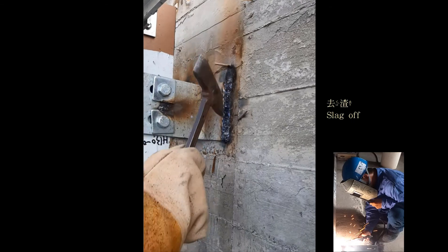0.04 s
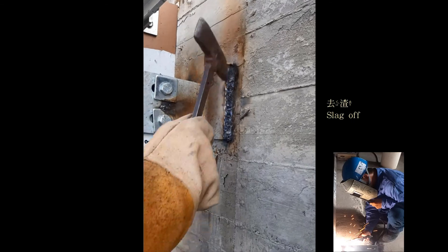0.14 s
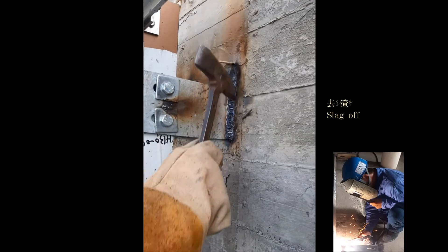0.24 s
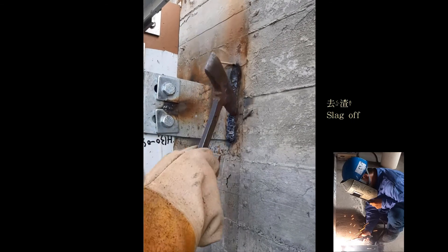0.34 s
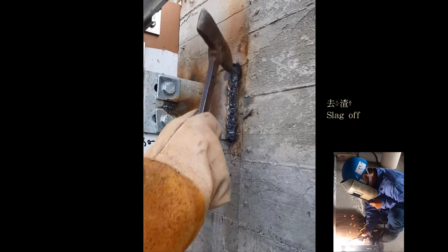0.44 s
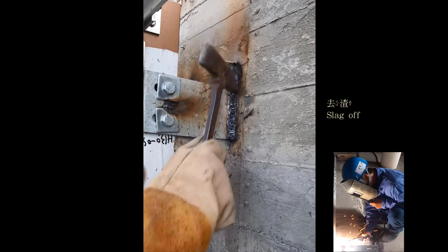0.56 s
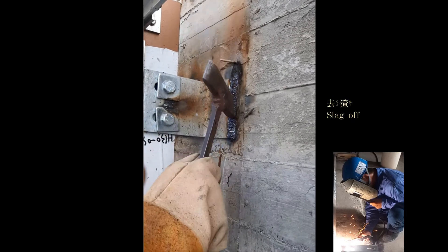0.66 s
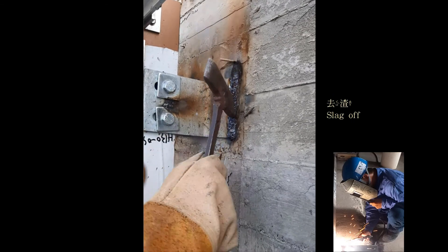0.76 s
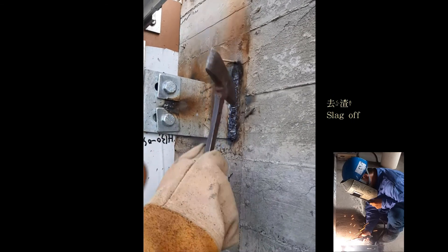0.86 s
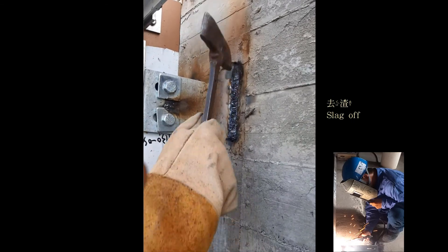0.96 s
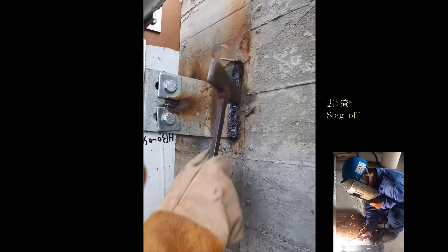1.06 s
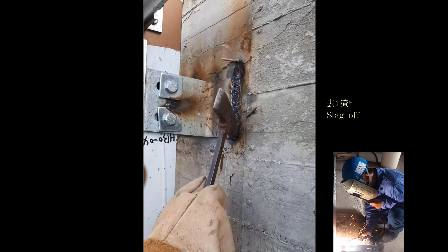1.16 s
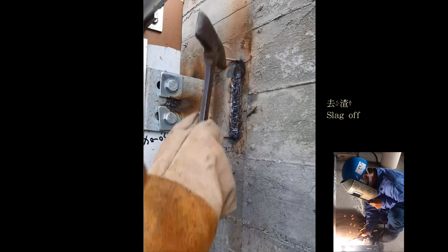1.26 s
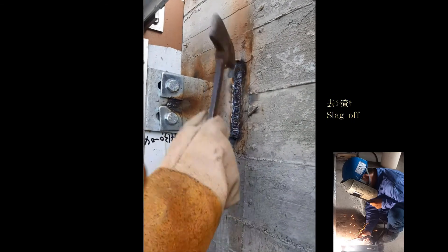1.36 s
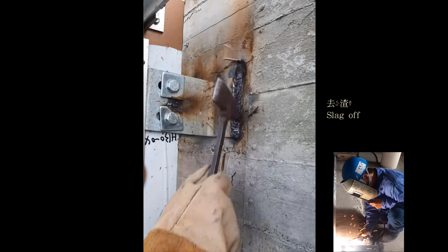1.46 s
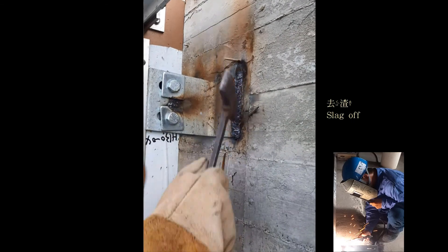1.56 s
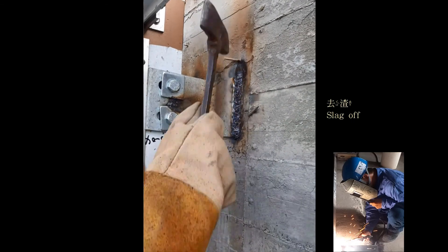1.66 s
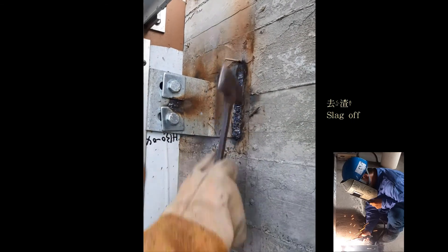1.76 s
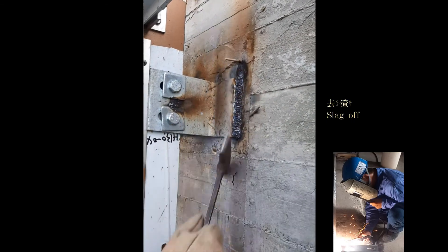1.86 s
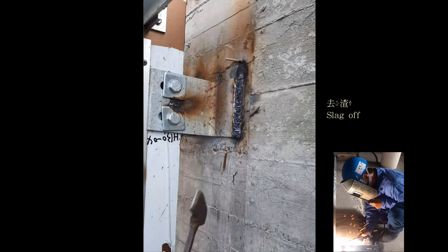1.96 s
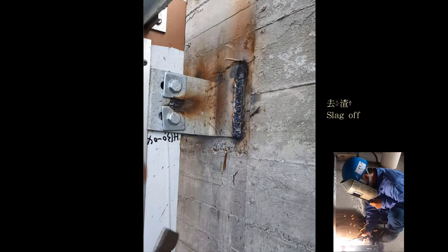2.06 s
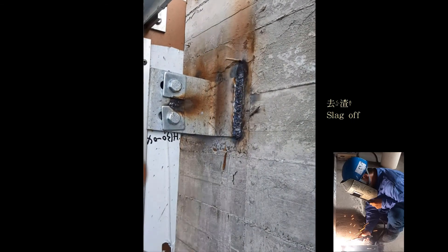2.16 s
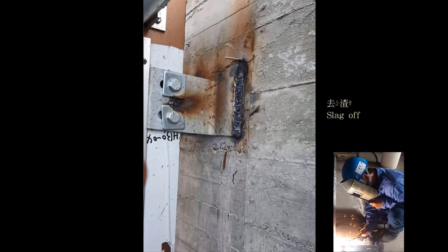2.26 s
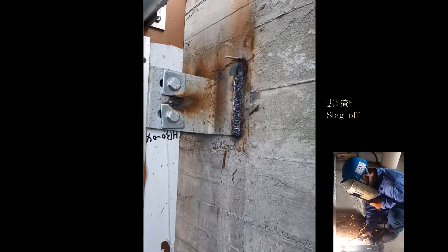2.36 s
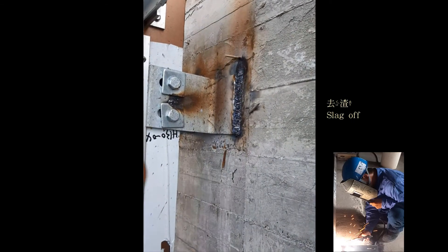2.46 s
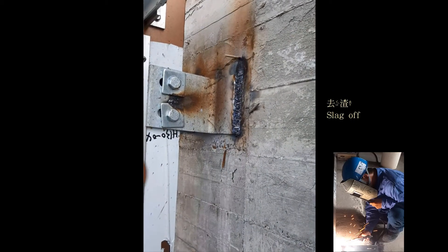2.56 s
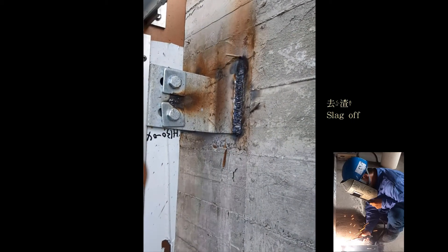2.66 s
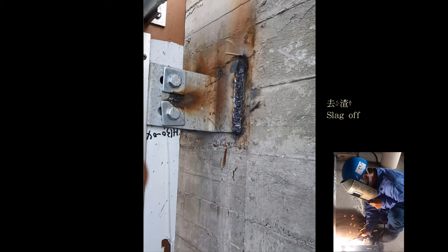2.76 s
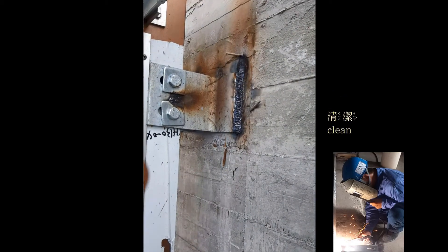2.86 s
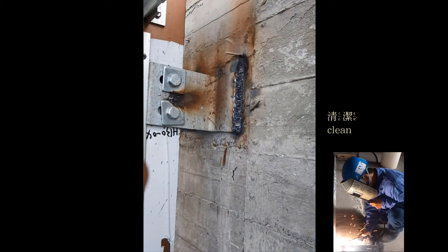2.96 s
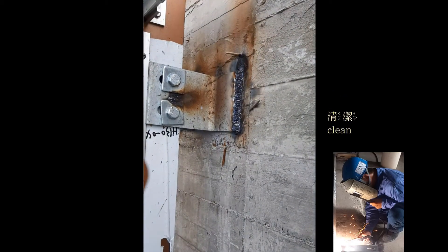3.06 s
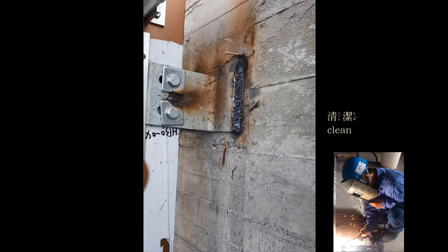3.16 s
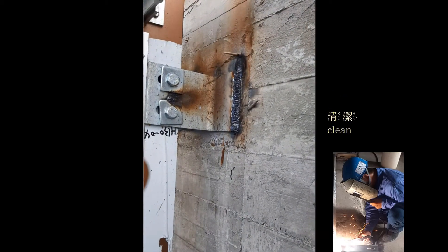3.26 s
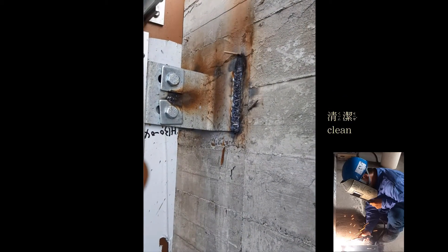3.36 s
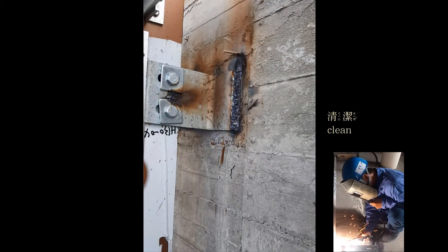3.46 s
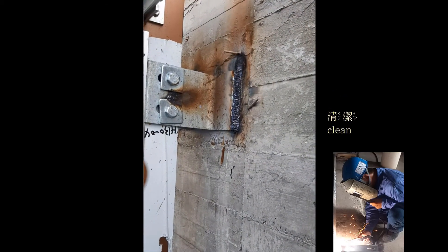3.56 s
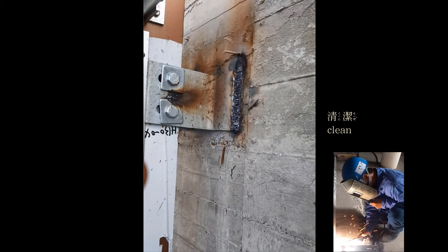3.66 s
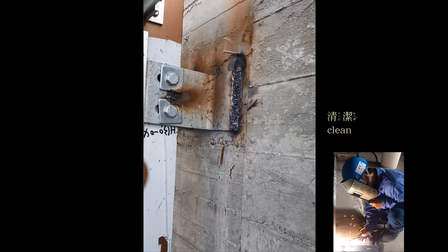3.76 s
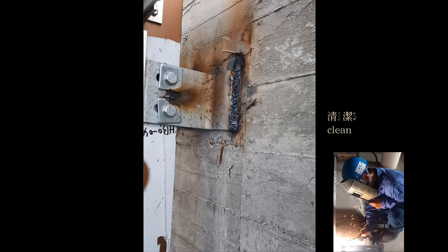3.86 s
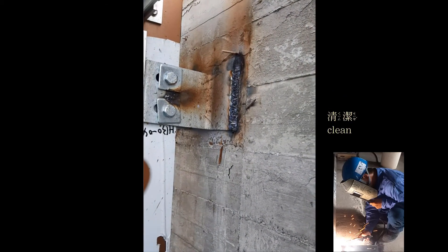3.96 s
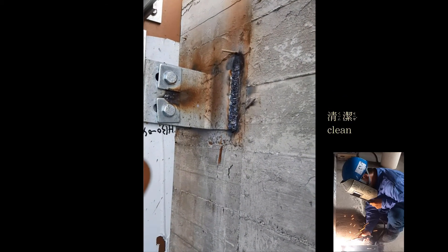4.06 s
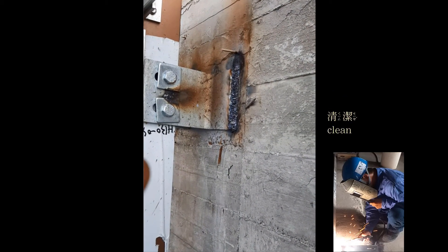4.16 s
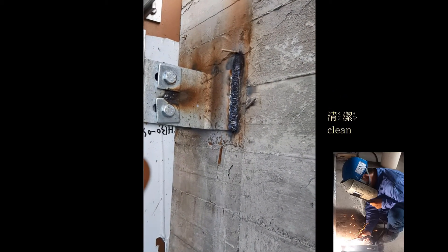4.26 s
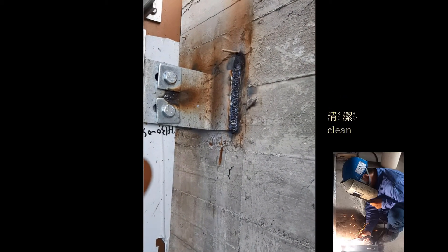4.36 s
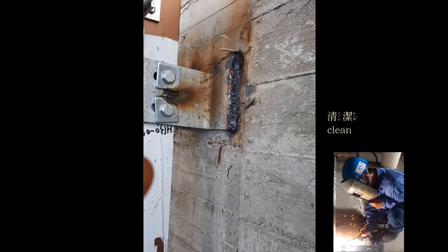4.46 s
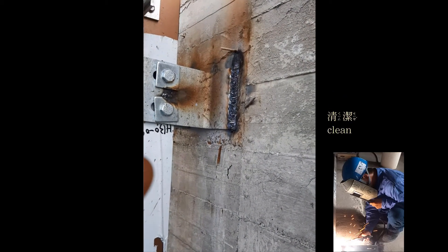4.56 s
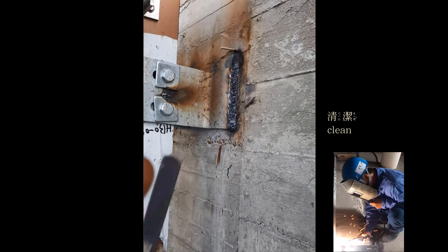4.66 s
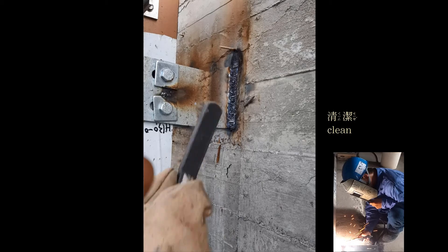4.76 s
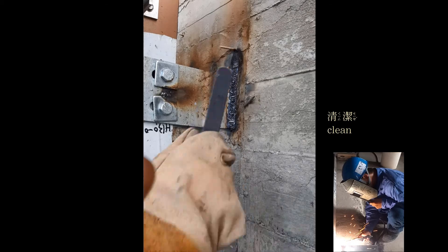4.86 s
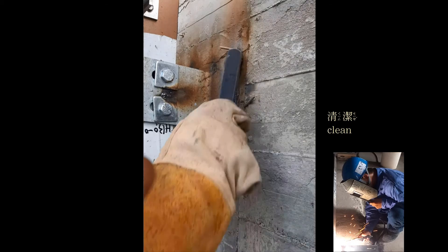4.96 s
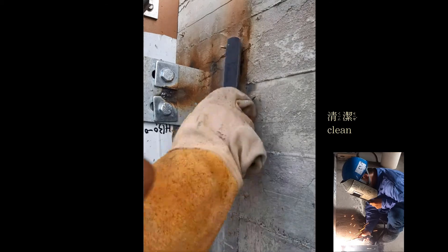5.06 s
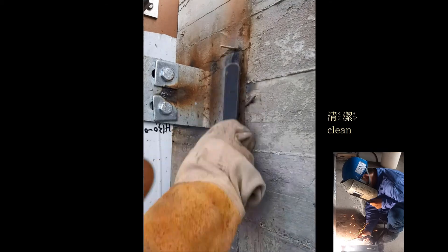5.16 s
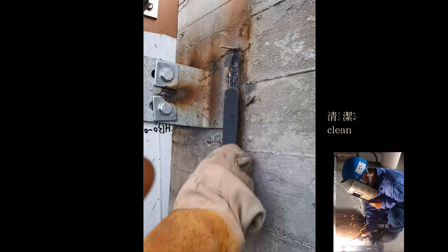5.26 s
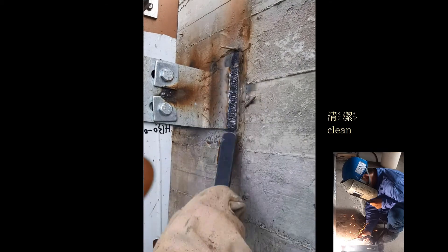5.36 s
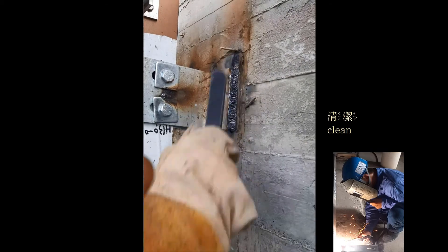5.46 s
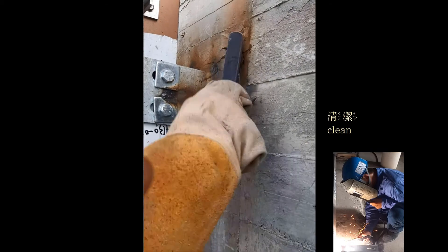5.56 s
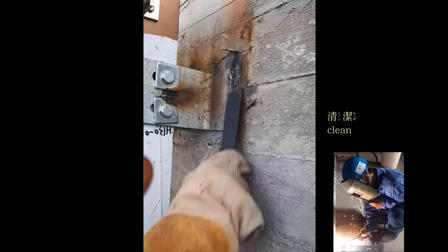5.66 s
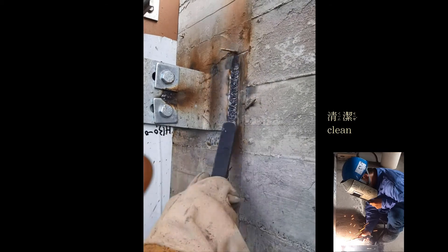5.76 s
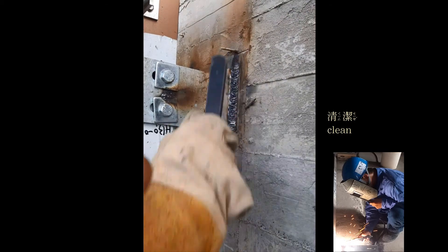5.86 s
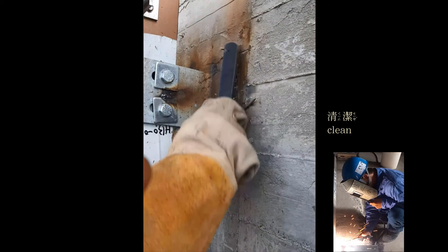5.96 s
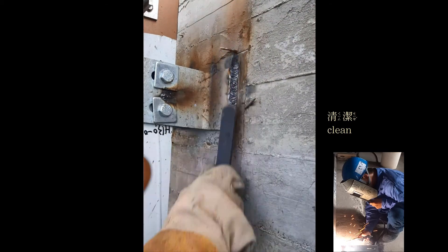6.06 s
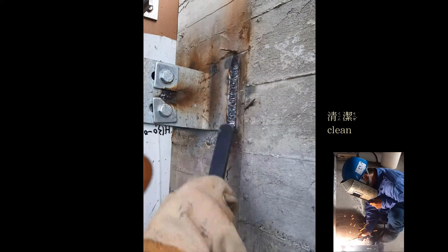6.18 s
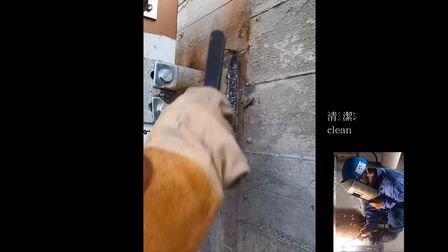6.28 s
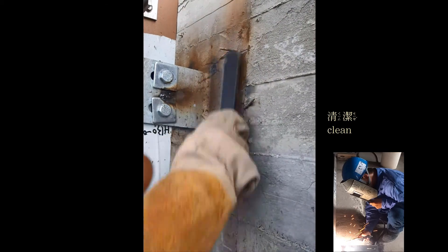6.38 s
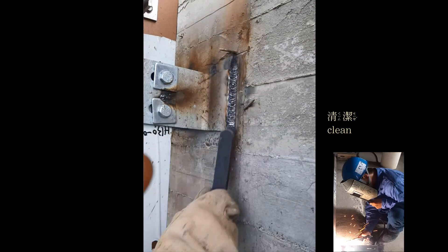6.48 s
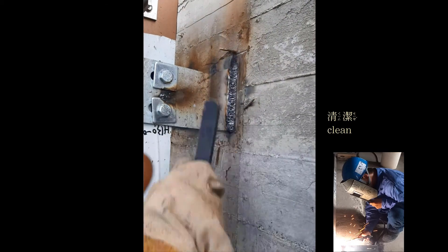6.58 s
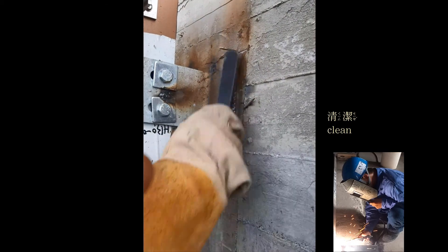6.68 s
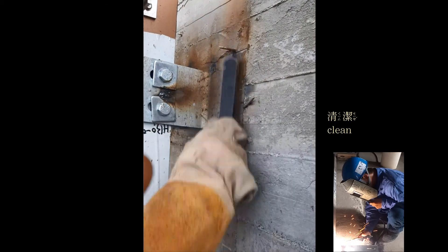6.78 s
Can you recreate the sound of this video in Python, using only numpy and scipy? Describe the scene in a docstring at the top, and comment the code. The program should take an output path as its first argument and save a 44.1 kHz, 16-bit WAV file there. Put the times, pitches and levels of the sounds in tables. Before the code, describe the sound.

Close up at an outdoor worksite, a chipping hammer strikes a weld in uneven sharp, high ringing clinks with quick rebounds and crunchy scrapes, ending in a rapid clatter. A pause follows with faint ticks and grit over distant machinery that grows louder. Then a wire brush knocks the steel and scrubs in five harsh, hissing strokes that speed up.

```python
"""At a worksite, a chipping hammer knocks slag off a weld on a steel bracket, then a wire brush scrubs it.
Distant machinery is filtered noise with brief low tones; the background grows louder after three seconds. Each
hammer blow is a burst of noise that sets steel modes ringing, with rebounds and drags along the bead. Flakes
tick down as short noise bursts with a ring, and grit rustles as random tiny contacts. The brush hisses and
rasps with its speed, and knocks, jingles and squeaks here and there."""
import sys
import numpy as np
from scipy import signal
from scipy.fft import rfft, irfft, next_fast_len
from scipy.io import wavfile
from scipy.ndimage import uniform_filter1d

SR = 44100
rng = np.random.default_rng(int(sys.argv[2]) if len(sys.argv) > 2 else 0)


def generate_wav(sig):
    """Save sig (samples, or channels by samples) to the path in sys.argv[1] as 16-bit PCM at SR."""
    pcm = np.round(np.clip(np.atleast_2d(sig).T, -1, 1) * 32767).astype(np.int16)
    wavfile.write(sys.argv[1], SR, pcm)


N = 300762
TIME = np.arange(N) / SR  # seconds

# Event levels are starting values that the functions trim; colours give relative level_db across pitch.

# worksite loudness over time: start_s, rumble_db, air_db
SITE_LEVELS = [(0.0, -49.5, -58.5), (1.85, -50.5, -57.5), (2.1, -53, -59), (2.96, -53.5, -58),
               (3.08, -45.5, -49.5), (3.5, -41.5, -46), (4.95, -39, -44.5), (6.82, -40.5, -45.5)]
# colour of the machinery rumble: pitch_hz, level_db
RUMBLE_COLOUR = [(15, -47.5), (25, -23), (38, -26.5), (59, -9.5), (92, -5), (130, 0), (172, 1), (285, -3),
                 (321, -5.5), (408, -4.5), (512, -9), (600, -20), (780, -54), (1320, -120)]
# colour of the far wash of air: pitch_hz, level_db
AIR_COLOUR = [(350, -25.5), (600, 1.5), (1000, -0.5), (1550, -2), (2100, -9.5), (4000, -15), (5500, -21.5),
              (7200, -24.5), (8300, -37), (11500, -32.5), (13000, -41.5), (16000, -65.5)]
# low tones that swell briefly in the rumble: centre_s, pitch_hz, half_length_s, level_db
RUMBLE_SWELLS = [(0.047, 114, 0.063, -49.5), (2.57, 205.5, 0.043, -43.5), (6.678, 80.2, 0.28, -42.5)]
# how alike left and right are, far and near: pitch_hz, likeness (0 to 1)
FAR_LIKENESS = [(30, .84), (70, .94), (140, .96), (300, .88), (600, .72), (1200, .5), (2500, .3),
                (6000, .2)]
NEAR_SIDES_LIKENESS = [(200, 1), (1000, 0.7), (3000, 0.78), (7000, 0.18), (14000, 0.62)]
# sound bends round the microphones: pitch_hz, left_lead_radians
LEFT_LEAD = [(300, 0.36), (1030, 0.49), (2150, 1.37), (3200, 1.87), (4000, 2.14), (4700, 0.94),
             (5250, 5.23), (6600, 3.62), (8000, 8.8), (11000, 8.02), (16000, 8.5)]

# flakes of slag landing: start_s, peak_db, treble_db, pitch_hz, ring_db
FLAKES = [(2.804, -39, -58, 1860, -36.5), (3.545, -40, -65, 3270, -43), (3.5947, -41.5, -60, 4500, -41),
          (3.6282, -46, -58, 4100, -46), (3.7319, -56, -62, 5530, -50), (3.969, -42.5, -57, 3680, -48),
          (4.0306, -36, -53, 4550, -46), (4.261, -60, -70, 2900, -47)]
# colours of a flake's body and treble: pitch_hz, level_db
FLAKE_COLOUR = [(700, -7), (1400, 1), (1850, -0.5), (2400, -16), (3000, -2), (4200, -3), (6500, 0),
                (8000, -17.5), (10000, -48.5)]
FLAKE_TREBLE_COLOUR = [(5000, -27), (8000, 4.5), (13000, 0), (16000, -21)]
# ring of a landing flake: pitch_multiple, level_db, t60_s (time to fade by 60 dB)
FLAKE_MODES = [(1, -0.5, 0.033), (1.24, -4.5, 0.028)]
# faint gritty rustles: centre_s, half_length_s, level_db
GRIT_RUSTLES = [(3.51, 0.033, -56), (3.666, 0.1, -59), (3.853, 0.048, -49.5), (4.045, 0.12, -53),
                (4.208, 0.016, -53.5), (4.365, 0.068, -59.5), (4.797, 0.061, -55.5)]
# colour of grit: pitch_hz, level_db
GRIT_COLOUR = [(1500, -11), (2400, 1), (4000, -1), (7200, 1), (8500, -8), (12500, -3), (16000, -36)]
# resonances of the rubbed bracket, damped by the brush: pitch_hz, level_db, t60_s
RUBBED_BRACKET_MODES = [(1270, -3, .04), (1380, -2, .04), (1570, -2, .04), (2360, -4, .05), (2600, -2, .05),
                        (3180, -2, .05), (4330, -1, .04), (4880, 0, .04), (5020, 0, .04), (5400, -1, .03),
                        (6000, -2, .03), (6950, -2, .04)]

# brush strokes along the weld: fastest_s, length_s, hiss_db, rasp_db
BRUSH_STROKES = [(5.295, 0.49, -1, -2.5), (5.735, 0.32, -1.5, -2), (6.111, .31, 1, 0),
                 (6.488, 0.27, 1.5, 0.5), (6.875, 0.26, 1.5, 3)]
# a few wires snag and spring free: start_s, hold_s, hiss_db, rasp_db
WIRE_SNAGS = [(4.998, 0.028, -69, -41), (5.036, 0.064, -49.5, -45.5), (5.13, 0.022, -66, -59.5),
              (5.48, 0.13, -65, -62), (5.593, 0.025, -50, -46), (5.665, 0.031, -42, -42.5),
              (5.761, .025, -45, -49), (6.257, 0.0045, -48, -49.5), (6.324, 0.0067, -41.5, -47),
              (6.372, 0.0037, -41, -49), (6.434, 0.029, -46, -34), (6.715, 0.04, -41.5, -43)]
# the brush meets the steel: start_s, knock_of_back_db, jingle_of_wires_db
BRUSH_BUMPS = [(4.998, -39, -30.5), (5.2538, -14.5, -54), (5.27, -28, -38), (6.060, -33, -42),
               (6.442, -22.5, -52)]
# colours of hiss, rasp, knock, hollow back and jingling wires: pitch_hz, level_db
HISS_COLOUR = [(3000, -3), (7000, 5.5), (8200, -2.5), (9500, 0), (11500, 1), (16000, -2.5)]
RASP_COLOUR = [(600, 1.5), (900, -14.5), (1450, 8.5), (1900, 4), (2400, 4), (3300, 5.5), (4600, 3),
               (5500, 3.5), (7200, -43), (8300, -23), (12000, -35)]
KNOCK_COLOUR = [(200, -34), (400, 3), (700, -39), (920, -4), (1500, 1.5), (2000, -20), (3000, -4),
                (6000, -26), (12000, -42)]
BACK_COLOUR = [(700, -7), (900, -12), (1150, 4.5), (1450, 5.5), (1900, -9), (5000, -48)]
JINGLE_COLOUR = [(1000, -4.5), (2100, -1), (2700, -2), (3250, -1), (3700, -4.5), (4200, -15), (5100, 4),
                 (6000, -43), (10000, -20), (16000, -52)]
# ring of the knocked brush back: pitch_hz, level_db, t60_s
BACK_MODES = [(440, -9, 0.036), (932, -1.5, 0.03), (1284, -17, 0.041), (1580, -16, 0.027),
              (2890, -20, .012)]
# free ring of the steel when the brush touches it: pitch_hz, level_db, t60_s
TOUCHED_STEEL_MODES = [(1990, -11, .4), (2530, -15, .5), (2681, -15, .4), (3149, -6.5, .4), (3219, -7, .7),
                       (3278, -4.5, .5), (3440, -8, .5), (3895, -14, .55), (4059, -13, .7), (4172, -9, .45),
                       (4484, -12, .7), (4651, -9, .4), (4872, -7, .45), (5073, -10, .55), (5340, -16, .5)]
# steel that sticks and squeaks: centre_s, pitch_hz, half_length_s, level_db
STEEL_SQUEAKS = [(3.475, 3700, 0.005, -43), (3.85, 2450, .014, -48), (4.83, 4360, 0.028, -52),
                 (5.32, 1550, 0.014, -30.5), (6.04, 2165, 0.011, -33), (6.061, 5260, 0.0054, -28),
                 (6.46, 1330, 0.02, -32.5), (6.465, 4950, .02, -38)]

# hammer blows and hard rebounds: start_s, crack_db, head_ring_db, high_ping_db, slag_snap_db, head_pitch_hz
HAMMER_BLOWS = [(0.228, -19, -21.5, -36.5, -44, 4660), (0.552, -15, -34, -50, -44, 4630),
                (0.5582, -17.5, -23, -28.5, -47, 4625), (0.826, -70, -60, -66, -72.5, 4675),
                (1.046, -13.5, -25, -27.5, -34, 4700), (1.049, -13, -16, -21, -14.5, 4720),
                (1.0943, -25, -42, -51, -36, 4675), (1.117, -34.5, -31, -38.5, -35.5, 4690),
                (1.1545, -33, -31.5, -51, -40.5, 4700), (1.1641, -31.5, -30.5, -58, -46.5, 4675),
                (1.415, -14.5, -14.5, -14.5, -14.5, 4665), (1.4211, -27.5, -12, -40, -34, 4670),
                (1.428, -25, -30.5, -38.5, -21.5, 4660), (1.476, -39.5, -23, -55, -48, 4690),
                (1.4947, -30.5, -24, -50, -29.5, 4690), (1.775, -11, -31.5, -20.5, -14.5, 4675),
                (1.7913, -12, -21, -15, -11, 4675), (1.8, -16.5, -27.5, -35, -32, 4675),
                (1.809, -17, -32, -41.5, -27, 4675), (1.846, -25, -11.5, -28, -31, 4675),
                (1.849, -23, -32.5, -24.5, -18, 4675), (1.868, -31, -35.5, -40, -18.5, 4675),
                (1.9168, -46, -57, -49, -35.5, 4675)]
# the tip drags down the bead: start_s, end_s, scrape_db, handle_hum_db
TIP_DRAGS = [(0.0, 0.02, -37.5, -33), (0.256, 0.348, -43, -39.5), (0.589, 0.659, -42, -34),
             (1.049, 1.114, -34.5, -35), (1.152, 1.161, -35, -26.5), (1.415, 1.5, -36, -31),
             (1.775, 1.845, -31.5, -24), (1.839, 1.86, -28.5, -41.5)]
# ringing hammer and bracket; close neighbours beat: pitch_hz, level_db, t60_s
STEEL_MODES = [(566, -27, .15), (798, -21, .17), (1249, -26, .12), (1530, -24, .08), (1880, -20, .05),
               (2174, -19, .12), (2549, -15, .15), (2690, -12, .12), (2801, -14, .13), (2880, -15, .13),
               (2935, -15, .13), (2995, -16, .1), (3105, -11, .11), (3166, -11, .1), (3255, -9, .07),
               (3349, -10, .13), (3450, -8, .05), (3550, -10, .05), (4250, -20, .09), (4547, -6, .07),
               (4765, -9, .05), (5016, -17, .09), (5127, -18, .08), (5280, -18, .07), (5420, -19, .07),
               (6085, -20, .1), (6595, -16, .08), (6880, -18, .06), (7430, -21, .06), (10110, -8, .085),
               (11225, -4, .04), (11275, -3, .04), (11555, -1, .04), (11615, -1, .04), (11900, -12, .02),
               (14000, -21, .05), (4673, -30, .55)]
# three close modes of the hammer's head that beat: pitch_above_head_hz, level_db, t60_s
HEAD_MODES = [(-65, -4, .045), (0, 3.5, .05), (53, -5, .045)]
# colours of the crack, the snapping slag and the scrape: pitch_hz, level_db
CRACK_COLOUR = [(150, -30), (500, -11.5), (1000, -16.5), (1500, -6.5), (2100, -9), (2600, -3.5),
                (3400, 1.5), (3950, -10.5), (4700, 5), (5500, -17), (7000, -22), (8500, -35.5),
                (11500, -33.5), (16000, -45.5)]
SNAP_COLOUR = [(3500, -21.5), (5500, -1), (6700, 2), (7600, -12), (8500, -21), (11500, -16), (15000, -32.5)]
SCRAPE_COLOUR = [(150, -19), (450, -4), (700, 12), (1000, 10.5), (1900, 3.5), (2700, 5.5), (3300, -1),
                 (5500, -3), (7200, -8.5), (8700, -24.5), (11500, -5), (13000, -29), (16000, -29)]

# bristle sounds grow as powers of brush speed: base level at full speed (dB), power
HISS_DB, HISS_POWER = -32, 3.04
RASP_DB, RASP_POWER = -33.5, 3.3
RASP_LEAD_S = 0.007  # the wires dig in before the brush is at full speed
SNAG_RISE_S, SNAG_FALL_S = 0.0019, 0.0067
# the bracket's weak modes: level against the crack (dB), time to fade by 60 dB (s)
CLATTER_DB, CLATTER_T60_S = -19.5, .09
# the head's note comes back in throbs: period (s), first throb (dB), loss per throb (dB)
THROB_S, THROB_DB, THROB_LOSS_DB = .0615, -23, 11.5
CUTOFF_HZ = 15800


def from_db(db):
    """Turn decibels into gain."""
    return 10 ** (np.asarray(db) / 20)


def rms_one(x):
    """Scale to unit power."""
    return x / np.sqrt(np.mean(x ** 2) + 1e-20)


def in_time(rows):
    """Join the points of each column by straight lines, giving a value at every sample."""
    s, *columns = np.transpose(rows)
    return [np.interp(TIME, s, column) for column in columns]


def at_hz(points, hz):
    """Read a table on a log-pitch axis."""
    f, value = np.transpose(points)
    return np.interp(np.log(hz + 1e-9), np.log(f), value)


def drift(rate):
    """Smooth random wander with spread 1; rate is in fresh values per second."""
    knots = rng.standard_normal(int(rate * N / SR) + 3)
    return rms_one(np.interp(TIME * rate, np.arange(len(knots)), knots))


def grains(per_s, spread_db):
    """Random tiny contacts of uneven size, unit power."""
    sizes = from_db(spread_db * np.minimum(rng.exponential(1, N), 4))
    sizes = sizes * rng.choice([-1, 1], N)
    return rms_one(sizes * (rng.random(N) < per_s / SR))


def noise(colour, likeness, source=None):
    """Coloured stereo noise, unit power, fading below its range; the part both sides share may be grainy."""
    size = next_fast_len(N)
    hz = np.arange(size // 2 + 1) * SR / size
    shared, left, right = rng.standard_normal((3, N))
    shared = shared if source is None else source
    alike = np.clip(at_hz(likeness, hz), 0, 1)
    mix = np.sqrt(alike) * rfft(shared, size) + np.sqrt(1 - alike) * rfft([left, right], size)
    gain = from_db(at_hz(colour, hz)) * np.minimum(hz / colour[0][0], 1) ** 2
    return rms_one(irfft(mix * gain, size)[:, :N])


def clicks(times, sizes):
    """One impulse at each time."""
    return np.bincount((np.asarray(times) * SR).astype(int), sizes, N)[:N]


def dying(times, db, t60):
    """Envelope of bursts that start at once and die away; their powers add."""
    keep = from_db(-120 / (t60 * SR))  # power kept from sample to sample
    power = signal.lfilter([1], [1, -keep], clicks(times, from_db(db) ** 2) + 1e-18)
    return np.sqrt(power)


def ring(force, hz, t60):
    """A resonance: a unit click sets a fading sine ringing from height 1."""
    r, w = from_db(-60 / (t60 * SR)), 2 * np.pi * hz / SR
    return signal.lfilter([0, np.sin(w)], [1, -2 * r * np.cos(w), r * r], force + 1e-18)


def swell(s, half_length):
    """A smooth rise and fall around one moment."""
    return np.exp(-np.minimum(((TIME - s) / half_length) ** 2, 60))


def chirps(rows, waver, rate):
    """Short wavering tones that swell and fade."""
    out = 0
    for s, hz, length, db in rows:
        tone = np.sin(2 * np.pi * hz * TIME + waver * drift(rate))
        out = out + from_db(db) * swell(s, length) * tone
    return out


def contact(rows, rise_s, fall_s):
    """Envelope of touches (start s, end s, dB): each bites, holds and lifts off; the strongest wins."""
    touches = []
    for start, end, db in rows:
        bite = np.minimum(TIME - start, 0) / rise_s
        lift = np.maximum(TIME - end, 0) / fall_s
        touches.append(from_db(db) * np.exp(np.maximum(bite - lift, -60)))
    return np.max(touches, axis=0)


def scattered(low_hz, high_hz, count):
    """Unevenly spaced pitches that fill a range."""
    return low_hz + (high_hz - low_hz) * (np.arange(count) + rng.random(count)) / count


def twanging(low_hz, high_hz, per_s, spread_db, t60, count):
    """Tiny contacts, each ringing briefly at one of several scattered pitches; unit power."""
    force = grains(per_s, spread_db)
    dealt = rng.integers(0, count, N)  # which pitch each contact gets
    pitches = scattered(low_hz, high_hz, count)
    return rms_one(sum(ring(force * (dealt == k), hz, t60) for k, hz in enumerate(pitches)))


def rubbed(modes, per_s, spread_db):
    """Random tiny contacts keep a body's modes ringing; unit power."""
    force = grains(per_s, spread_db)
    return rms_one(sum(from_db(db) * ring(force, hz, t60) for hz, db, t60 in modes))


def worksite():
    """Distant machinery: a steady rumble with brief tones, under a faint wash of air from the right."""
    rumble_db, air_db = in_time(SITE_LEVELS)
    rumble = from_db(rumble_db + 2.0 + 1.0 * drift(9.8)) * noise(RUMBLE_COLOUR, FAR_LIKENESS)
    left, right = from_db(air_db + 1.0 + .5 * drift(14)) * noise(AIR_COLOUR, FAR_LIKENESS)
    late_left = np.pad(left, (round(.00013 * SR), 0))[:N]  # the left hears it 0.13 ms later
    return rumble + np.array([late_left, right]) + chirps(RUMBLE_SWELLS, waver=0.71, rate=24)


def walls(x, wash_db, t60):
    """A thin, dull, diffuse tail from the concrete round about, made of fading noise."""
    age = TIME[:SR // 2]
    fade = np.exp(-np.log(1000) * age / t60) * (age > .006)  # silent for the first 6 ms
    tail = rng.standard_normal((2, len(age))) * fade
    tail /= np.sqrt(np.sum(tail ** 2, axis=1, keepdims=True))
    wet = from_db(wash_db) * signal.fftconvolve(x, tail, axes=1)[:, :N]
    return signal.sosfilt(signal.butter(2, 4000, fs=SR, output="sos"), wet)


def place(x, pan_db):
    """Close work is a little louder on the left, which leads by a phase that changes with pitch."""
    size = next_fast_len(N + 2000)
    hz = np.arange(size // 2 + 1) * SR / size
    phase = uniform_filter1d(at_hz(LEFT_LEAD, hz), size=size // 50)
    turn = np.exp(.5j * phase)  # half the lead for each side
    sides = np.array([turn * from_db(pan_db / 2), from_db(-pan_db / 2) / turn])
    return irfft(rfft(x, size) * sides, size)[:, :N]


def grit_rustle():
    """Grit crackles: clumps of tiny contacts, some of which ring the bracket or twang."""
    clumps = from_db(4 * np.tanh(drift(35)))
    grit = .6 * noise(GRIT_COLOUR, NEAR_SIDES_LIKENESS, grains(500, spread_db=4))
    grit = grit + .6 * rubbed(RUBBED_BRACKET_MODES, per_s=400, spread_db=3)
    grit = clumps * grit + .9 * twanging(2300, 5400, per_s=260, spread_db=2, t60=.16, count=16)
    return sum(from_db(db) * swell(s, length) for s, length, db in GRIT_RUSTLES) * grit


def ticks():
    """Flakes land as short dry bursts, each ringing at its own pitch, among rustling grit."""
    s, db, treble_db, pitch_hz, ring_db = np.transpose(FLAKES)
    body = dying(s, db - 0.5, t60=0.036) * noise(FLAKE_COLOUR, NEAR_SIDES_LIKENESS)
    top = dying(s, treble_db + 3.0, t60=0.053) * noise(FLAKE_TREBLE_COLOUR, NEAR_SIDES_LIKENESS)
    clack = 0
    for at, hz, level_db in zip(s, pitch_hz, ring_db):
        for ratio, mode_db, t60 in FLAKE_MODES:
            clack = clack + ring(clicks([at], [from_db(level_db + mode_db)]), hz * ratio, t60)
    return body + clack + top + grit_rustle()


def stroking(levels_db, power, lead_s):
    """Each stroke's speed follows half a sine; the sound follows its level and a power of speed."""
    out = 0
    for (s, length, *_), db in zip(BRUSH_STROKES, levels_db):
        angle = np.pi * np.clip((TIME + lead_s - s) / length, -1, 1)
        speed = np.maximum(np.cos(angle), 0)
        out = out + from_db(db) * speed ** power
    return out


def bristles(likeness):
    """Thousands of wire tips catch and spring free, faster strokes sounding louder."""
    start, hold, snag_hiss_db, snag_rasp_db = np.transpose(WIRE_SNAGS)
    _, _, hiss_db, rasp_db = np.transpose(BRUSH_STROKES)
    end = start + hold
    hissing = from_db(HISS_DB) * stroking(hiss_db, HISS_POWER, 0)
    hissing = hissing + contact(zip(start, end, snag_hiss_db), SNAG_RISE_S, SNAG_FALL_S)
    rasping = from_db(RASP_DB) * stroking(rasp_db, RASP_POWER, RASP_LEAD_S)
    rasping = rasping + contact(zip(start, end, snag_rasp_db), SNAG_RISE_S, SNAG_FALL_S)
    hiss = hissing * noise(HISS_COLOUR, likeness, grains(12000, spread_db=13.0))
    rasp = rasping * noise(RASP_COLOUR, likeness, grains(5000, spread_db=6.5))
    # single wires twang briefly at scattered pitches, and set the bracket ringing
    twangs = twanging(2250, 6900, per_s=420, spread_db=2, t60=.08, count=44)
    bracket = rubbed(RUBBED_BRACKET_MODES, per_s=1500, spread_db=3)
    rasp = from_db(-4) * rasp + rasping * (from_db(-2) * twangs + from_db(-3.5) * bracket)
    # stiffer wires click over the ripples of the bead
    stiff = twanging(3000, 6800, per_s=400, spread_db=3, t60=.016, count=14)
    rasp = rasp + from_db(-4) * rasping * stiff
    catching = from_db(1.4 * drift(160) + .6 * drift(35))  # uneven grip
    return catching * (hiss + rasp)


def brush_bumps(likeness):
    """The brush's back knocks hollowly against the bracket, while wires jingle and steel chimes."""
    s, knock_db, jingle_db = np.transpose(BRUSH_BUMPS)
    knock = dying(s, knock_db - 4.0, t60=0.017) * noise(KNOCK_COLOUR, NEAR_SIDES_LIKENESS)
    knock = knock + sum(ring(clicks(s, from_db(knock_db + db - 1.5)), hz, t60) for hz, db, t60 in BACK_MODES)
    back = dying(s, knock_db - 13.5, t60=0.22) * noise(BACK_COLOUR, NEAR_SIDES_LIKENESS)
    jingle = dying(s, jingle_db - 0.5, t60=0.2) * noise(JINGLE_COLOUR, likeness)
    chime = sum(ring(clicks(s, from_db(jingle_db + db - .5)), hz, t60) for hz, db, t60 in TOUCHED_STEEL_MODES)
    return jingle + chime + knock + back


def brush():
    """A wire brush: scrubbing bristles, bumps against the steel, and stick-slip squeaks."""
    likeness = [(500, 0.71), (3000, 0.029), (12000, 0.08)]  # pitch_hz, likeness
    return bristles(likeness) + brush_bumps(likeness) + chirps(STEEL_SQUEAKS, waver=0.73, rate=760)


def slag_crack(s, crack_db, snap_db):
    """A sharp bite of noise with a weaker, longer tail, plus the bright snap of slag."""
    bite, tail = dying(s, crack_db + 1, t60=.012), dying(s, crack_db - 8, t60=0.045)
    crack = np.hypot(bite, tail) * noise(CRACK_COLOUR, NEAR_SIDES_LIKENESS)
    return crack + dying(s, snap_db - 5.0, t60=0.028) * noise(SNAP_COLOUR, NEAR_SIDES_LIKENESS)


def clatter(s, crack_db):
    """The bracket's many weak modes: each blow starts each mode with a random sign."""
    out = 0
    for hz in scattered(1300, 7500, count=60):
        sizes = from_db(crack_db + at_hz(CRACK_COLOUR, hz) + CLATTER_DB)
        force = clicks(s, sizes * rng.choice([-1, 1], len(s)))
        out = out + ring(force, hz, CLATTER_T60_S)
    return out


def loose_chips(s, crack_db):
    """Loose chips rattle off the bracket from 8 ms after each blow."""
    rattle = twanging(2400, 7000, per_s=450, spread_db=3, t60=.012, count=14)
    return dying(s + .008, crack_db - 19, t60=.17) * rattle


def slag_scrape(drag):
    """The dragging tip crunches crumbs of slag and makes them twang."""
    crumbs = np.flatnonzero(rng.random(N) < 110 / SR) / SR  # each crumb snaps on its own
    crunch = .9 + .5 * rms_one(dying(crumbs, rng.normal(0, 2, len(crumbs)), t60=.025))
    scrape = drag * crunch * from_db(-5.5) * noise(SCRAPE_COLOUR, NEAR_SIDES_LIKENESS)
    twangs = twanging(1400, 7400, per_s=500, spread_db=2, t60=.07, count=22)
    return scrape + drag * from_db(-6.5) * twangs


def steel_ring(s, crack_db, head_db, ping_db, bumps):
    """Blows and the bumps of the drag set the modes of hammer and bracket ringing."""
    steel = 0
    for k, (hz, db, t60) in enumerate(STEEL_MODES):
        # each family of modes answers to where the tip lands
        if hz > 9000:
            strength_db, bump_db = ping_db - 3.5, -29
        elif 4400 < hz < 4900:  # modes of the head
            strength_db, bump_db = head_db - 4.0, -31
        else:
            strength_db, bump_db = crack_db - 5.0, -35
        force = clicks(s, from_db(strength_db + 2 * rng.standard_normal(len(s))))
        force = force + from_db(bump_db) * bumps
        # neighbours start in opposite phase, so a cluster swells before it fades
        steel = steel + (-1) ** k * from_db(db) * ring(force, hz, t60)
    return steel


def head_note(s, head_db, pitch_hz):
    """The head's close modes swell and fade, at a pitch that shifts with how hard its tip is pressed."""
    age, out = TIME[:SR // 10], np.zeros(N + SR)
    for at, level_db, hz in zip((s * SR).astype(int), head_db, pitch_hz):
        for k, (offset, db, t60) in enumerate(HEAD_MODES):
            height = (-1) ** k * from_db(level_db + db - 60 * age / t60)
            out[at:at + len(age)] += height * np.sin(2 * np.pi * (hz + offset) * age)
    return out[:N]


def head_throbs(head):
    """The head's note comes back in four faint, regular throbs."""
    throbs = 0
    for k in range(4):
        late = np.pad(head, ((k + 1) * round(THROB_S * SR), 0))[:N]
        throbs = throbs + from_db(THROB_DB - THROB_LOSS_DB * k) * late
    return throbs


def handle_hum(start, end, handle_db):
    """Stick and slip keep the handle's bending mode humming and juddering."""
    pitch_hz = 799 + 10 * drift(70)
    humming = contact(zip(start, end, handle_db), rise_s=0.0018, fall_s=0.012)
    judder = twanging(660, 900, per_s=700, spread_db=2, t60=.03, count=8)
    tone = from_db(-1.5 + 2.6 * drift(45)) * np.sin(2 * np.pi * np.cumsum(pitch_hz) / SR)
    return humming * (tone + from_db(-9) * judder)


def hammer():
    """Blows and the bumpy drag over the bead both drive the steel's modes; slag cracks and crunches."""
    s, crack_db, head_db, ping_db, snap_db, pitch_hz = np.transpose(HAMMER_BLOWS)
    start, end, scrape_db, handle_db = np.transpose(TIP_DRAGS)
    drag = contact(zip(start, end, scrape_db), rise_s=0.0017, fall_s=0.019)
    bumps = drag * grains(1100, spread_db=4.5)
    slag = slag_crack(s, crack_db, snap_db) + loose_chips(s, crack_db) + slag_scrape(drag)
    steel = clatter(s, crack_db) + steel_ring(s, crack_db, head_db, ping_db, bumps)
    head = head_note(s, head_db + 3.0, pitch_hz)
    # the drag keeps the head singing weakly
    head = head + from_db(-30.5) * ring(bumps, pitch_hz.mean(), t60=0.061)
    return slag + steel + head + head_throbs(head) + handle_hum(start, end, handle_db)


def scene():
    """The site behind, the walls round about, the tools close by."""
    tools = place(ticks() + brush() + hammer(), pan_db=0.6)
    # small tools radiate no bass
    tools = signal.sosfilt(signal.butter(2, 110, "high", fs=SR, output="sos"), tools)
    return worksite() + walls(tools, wash_db=-13.0, t60=0.32) + tools


def record(dry):
    """The highest peaks are rounded; the top is cut steeply."""
    ceiling = .7
    rounded = ceiling * np.tanh(dry / ceiling)
    return signal.sosfilt(signal.ellip(10, .2, 80, CUTOFF_HZ, fs=SR, output="sos"), rounded)


dry = scene()
out = record(dry)
generate_wav(out)
```